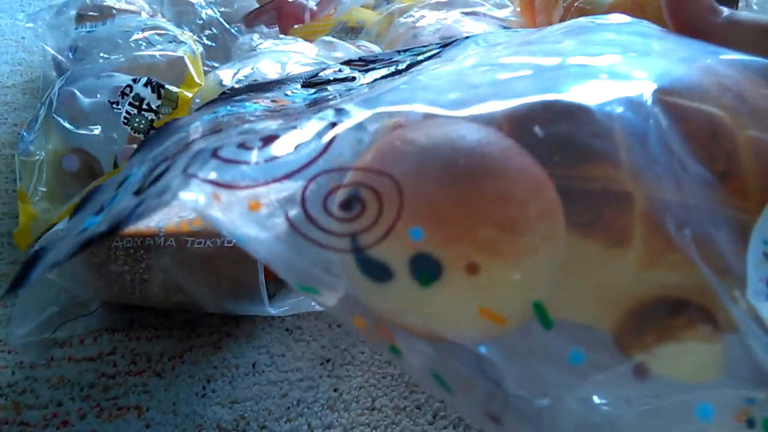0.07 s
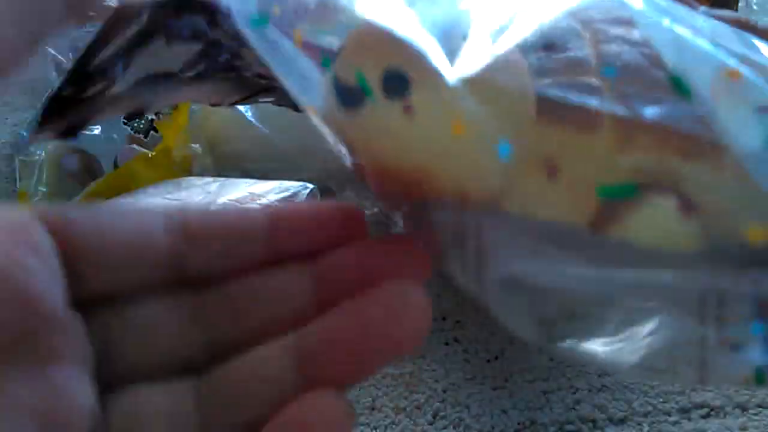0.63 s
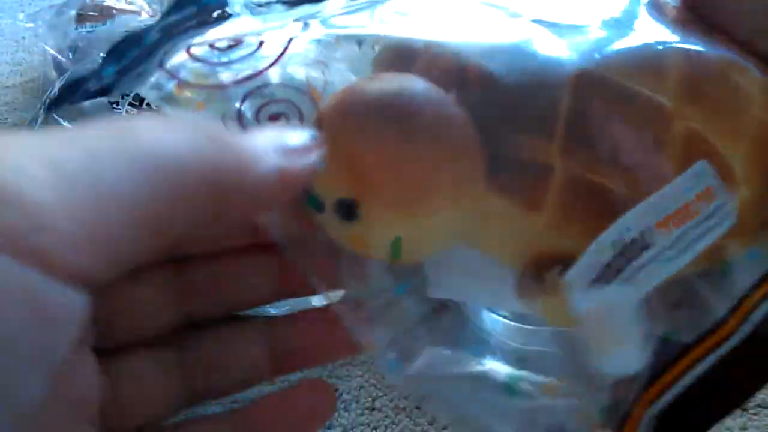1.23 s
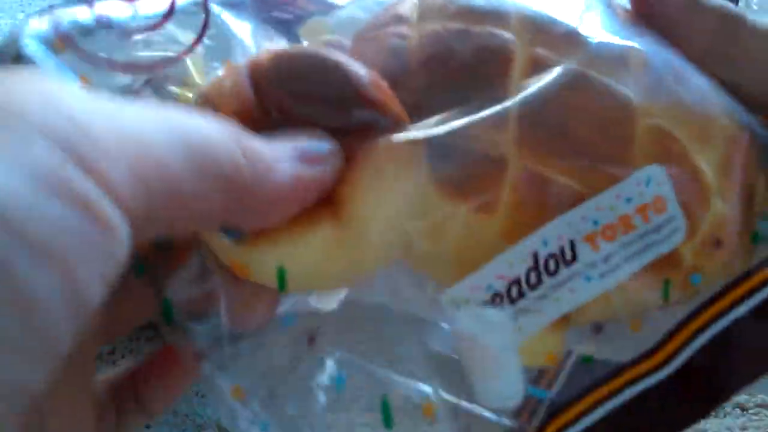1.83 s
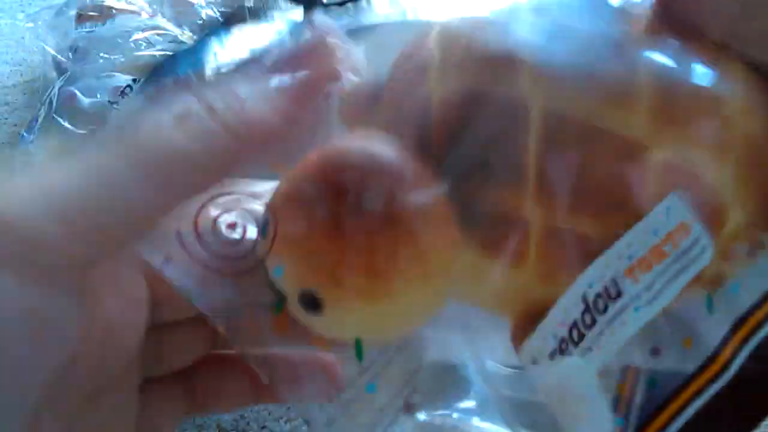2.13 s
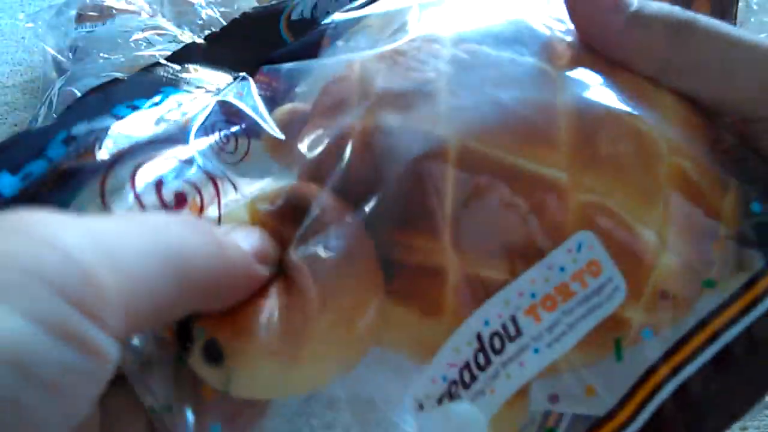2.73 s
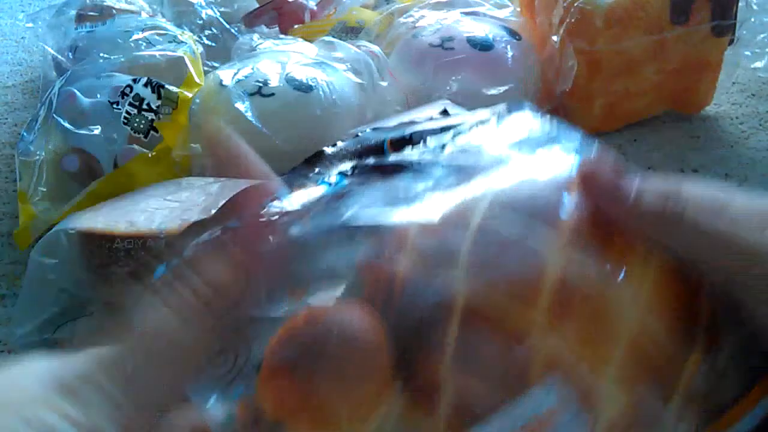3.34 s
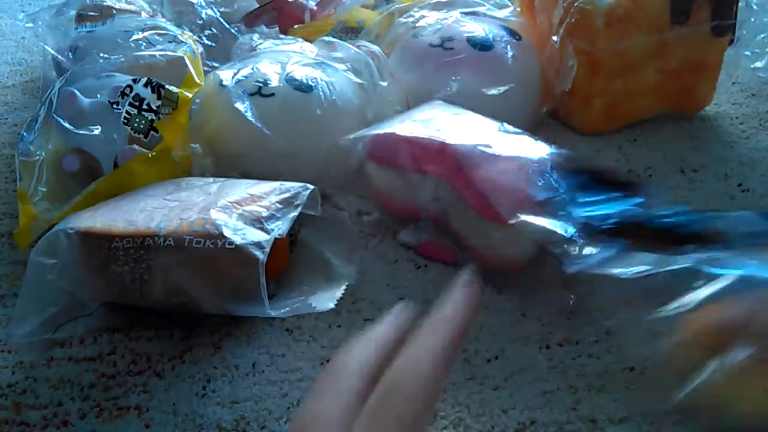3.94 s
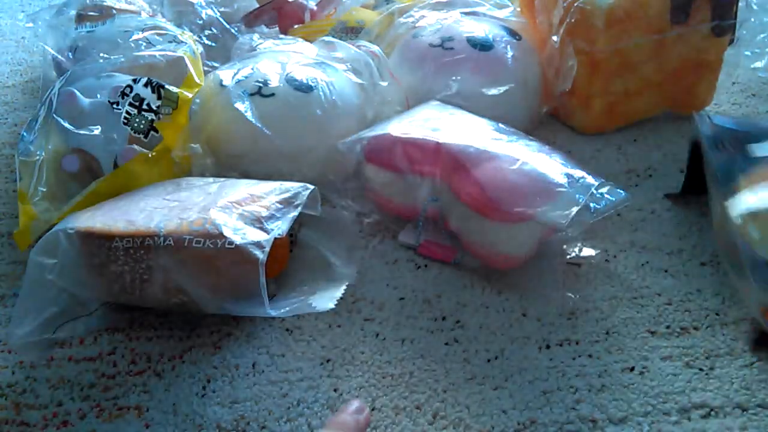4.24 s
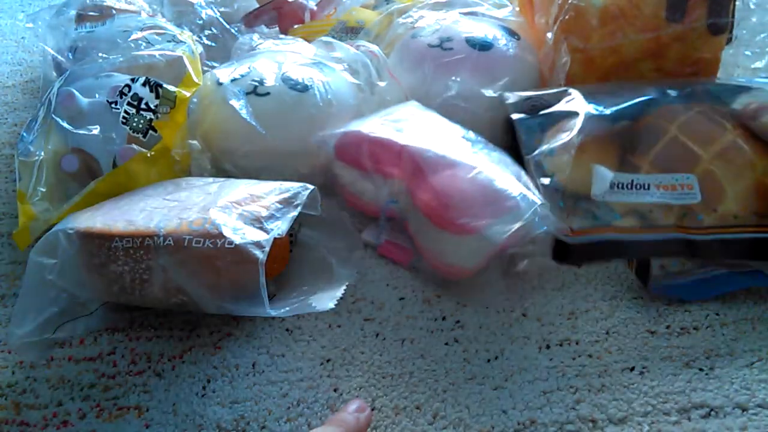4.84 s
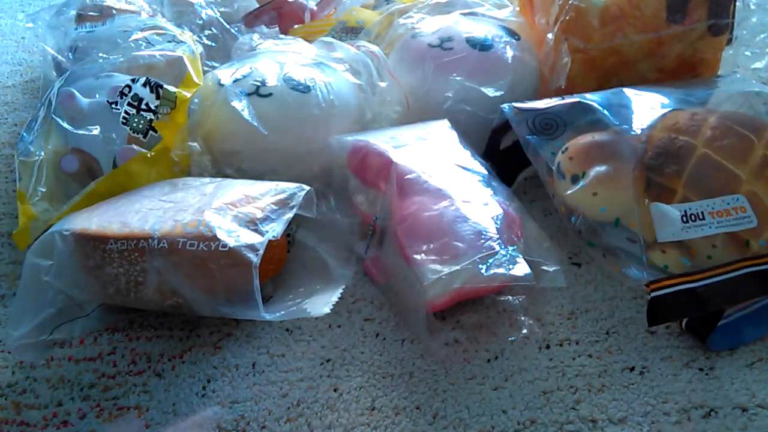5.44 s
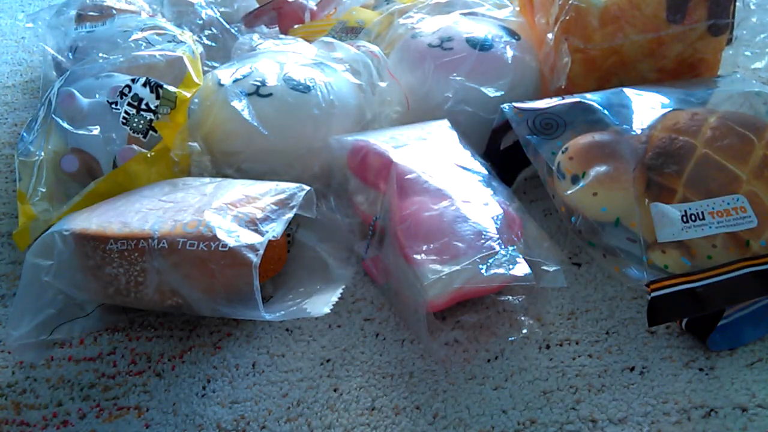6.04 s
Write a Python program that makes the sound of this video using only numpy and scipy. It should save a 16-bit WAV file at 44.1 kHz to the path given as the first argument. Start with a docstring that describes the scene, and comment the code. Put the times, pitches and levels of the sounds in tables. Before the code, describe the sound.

A stiff plastic bag crinkles and snaps close by as a foam toy inside is squeezed, then slides hissing across carpet.

```python
"""A dry, furnished room with a carpet; one small microphone close to a foam toy in a stiff plastic bag.
The bag is squeezed, then pushed aside along the carpet. Creases buckle in single sharp snaps over
a bed of tiny crinkles, the film hisses as it slides, and carpet fibres scrape under it.
Hands and toy rumble softly close by; behind them are the room's short tail and its low hum."""
import sys
import numpy as np
from scipy import signal
from scipy.fft import rfft, irfft, next_fast_len
from scipy.io import wavfile
from scipy.ndimage import map_coordinates

SR = 44100
rng = np.random.default_rng(int(sys.argv[2]) if len(sys.argv) > 2 else 0)


def transcribe(signal):
    """Save signal, clipped to [-1, 1], as a 16-bit WAV file at the path in sys.argv[1]."""
    frames = np.atleast_2d(signal).T
    limited = np.clip(frames, -1, 1)
    pcm = np.round(limited * 32767).astype(np.int16)
    wavfile.write(sys.argv[1], SR, pcm)


N = 268128

# Levels in the tables are relative; each layer's own gain is applied on top.
# creases buckling: start_s, level_db, brightness_db_per_octave, panel_pitch_hz, pop_db
CREASE_SNAPS = [(0.325, -18, 6.5, 7440, -6), (0.3826, -19.5, 4.5, 7650, 5), (0.494, -21, -6, 1550, 14),
                (0.653, -24.5, 6.5, 1500, 28), (0.676, -10.5, 4, 1310, 14), (0.899, -37, 13, 7500, 7),
                (0.9538, -23.5, 11, 4000, 3), (1.0256, -11.5, -6, 2500, 5), (1.0363, 15.5, 3.5, 1310, 6),
                (1.0854, 11, 0.5, 1400.0, 10), (1.1103, -3.5, 0.5, 1300.0, 15), (1.15, 14, 1.5, 1600.0, 6),
                (1.1798, 0, -2, 3120, 2.5), (1.276, -13, -7, 1500.0, 8.5), (1.2942, 10.5, 0.5, 6400, 8),
                (1.3085, -1.5, -1, 4400.0, 5), (1.3282, -6.5, -2.5, 1640, 15.5),
                (1.3768, -20, -2, 1450, 20), (1.4887, 1.5, 3, 5830, 10), (1.5094, -6.5, -2, 1700, 25),
                (1.5632, -21.5, -9, 1510, 8.5), (1.6273, -11, -1.5, 1480, 13.5), (1.6598, 4, 4, 1310, 14.5),
                (1.6656, -2, -3, 1500.0, 15), (1.6726, -10, 8, 1700.0, 23), (1.6853, 11, -3, 1500.0, 4),
                (1.6958, 9, 3, 1400.0, 13), (1.6999, 8.5, -3, 1450, 12.5), (1.7122, 12, 4, 1480, 17.5),
                (1.7602, -3.5, 3.5, 1690, 16.5), (1.7802, -3, -3.5, 2730, 9), (1.9914, 10, 2, 1860, 4),
                (1.9997, -21.5, -5.5, 1840, 22), (2.1022, -7.5, 1, 4730, 9),
                (2.1324, -17.5, 12.5, 6100, 12.5), (2.187, 8, 3, 1200.0, 13.5),
                (2.211, -3.5, -3, 5000.0, 24), (2.2179, 7.5, -1, 1630, 7), (2.2867, 12.5, 2.0, 1800, 14),
                (2.2945, 9.5, -1.5, 1600.0, 4), (2.3492, 8, -0.5, 1860, 11), (2.4509, -9.5, -4, 1800.0, 9),
                (2.484, -21, -4.5, 1400.0, 20), (2.5163, 0, -3, 2860, 11), (2.5313, 4.5, -1.5, 7360, 9.5),
                (2.5343, 6, 3.5, 1630, 12), (2.5802, -1.5, -2, 1970, 4), (2.6329, -5, -4, 2000.0, 5),
                (2.6365, 5.5, 0, 1250, 16.5), (2.6566, -1.5, 1, 1740, 15), (2.6858, 10.5, 3.5, 2500, 13.5),
                (2.739, 5.5, 2.5, 756, 10), (2.742, -5.5, -2.5, 3900.0, 15), (2.7638, -2, 3.5, 4970, 5),
                (2.7737, -10.5, -5.5, 1590, 9.5), (2.986, 6.5, 2.5, 1640, 13.5),
                (3.0993, -7, 6.5, 700.0, 25), (3.1116, -11.5, -5.5, 2330, 16), (3.1533, 8, 2, 7500.0, 3),
                (3.1585, 4.5, 5.5, 6300.0, 16.5), (3.1612, 17.5, 4, 1970, 10), (3.1721, 3.5, -5, 5000.0, 9),
                (3.19, -6, -2, 7500, 11), (3.2027, -2, -2, 1800, 2), (3.268, -1, -3.5, 940.0, 0),
                (3.386, -12.5, -7.5, 900, -8), (3.4765, -10.5, 6.5, 1300.0, 18),
                (3.498, 2.5, -2, 3900.0, 7), (3.504, 19, 2.5, 860, 4.5), (3.607, 7, -2.5, 3560, 5),
                (3.6517, 2.5, -2.5, 6800, 14), (3.6598, 6.5, -4.5, 2000.0, 7.5), (3.692, 7, -1, 7500.0, 8),
                (3.709, -6.5, 6, 940.0, 26), (3.7297, -4, 2, 3070, 19), (3.753, -1, -1.5, 2000.0, 4.5),
                (3.7893, -10, -5.5, 2600.0, 11), (3.823, 0, -3.5, 4720, 8), (3.848, -0.5, -3, 890.0, 11.5),
                (3.8899, 1.5, -2.5, 1800.0, 13), (3.9013, 8.5, 0.5, 2200.0, 4.5),
                (3.9542, -4.5, -1, 1600.0, 11), (3.968, 7.5, 1.5, 700.0, 3.5),
                (3.9727, -3.5, 3.5, 7500.0, 6), (4.0134, 1, 8.5, 710, 20), (4.0289, 7.5, 0, 730, 11),
                (4.06, 11, 1.5, 700.0, 3.5), (4.0835, -13, -9.5, 3700.0, 17.5),
                (4.0877, -9.5, -6.5, 7100.0, 20), (4.174, -5, -4.5, 8100, 23.5),
                (4.3061, 5.5, -2, 3150, 7.5), (4.3955, -1, -2.5, 3300.0, 12.5), (4.4298, -8, -2, 740.0, 13),
                (4.4633, -2.5, -4, 7600, 11), (4.5192, 10.5, -2.5, 695, -6),
                (4.6159, 11.5, 2.5, 3700.0, 5.5), (4.638, 5, -1.5, 6400, 14.5),
                (4.675, -4.5, 1.5, 1730, 13.5), (4.7182, -6.5, 11, 900, 42), (4.7314, -4.5, 8.5, 8100, 9.5),
                (4.7789, 3.5, -5, 7640, 11), (4.809, -7, 13.5, 700.0, 21), (4.814, 7, 0.5, 7550, 1),
                (4.9224, 1.5, 8, 3460, 0), (5.0058, -7, 9, 7600, 7.5), (5.0217, 9, 0.5, 865, 10),
                (5.0808, 4.5, 6.5, 700.0, 8), (5.1039, 2, 1, 4570, 4.5), (5.1923, -2.5, -4, 2900.0, -2),
                (5.201, -5, -0.5, 1300.0, 3.5), (5.2764, -18, 10, 950, 38), (5.5154, 1, 8.0, 2970, 8.5)]
# a snapping panel of film: frequency_hz, level_db
FILM_SPECTRUM = [(100, -19), (370, -6), (690, -2.5), (1010, -8), (1400, -3.5), (1750, -3.5), (2200, -5.5),
                 (2830, -8.5), (4800, -10), (8140, -12), (10500, -18), (16000, -34)]
# narrow rings the microphone adds to every snap: pitch_hz, width_hz, level_db
MIC_RINGS = [(460, 23, -33), (3940, 220, 9)]
# many small creases together: frequency_hz, level_db
CRUMPLE_SPECTRUM = [(100, -5.5), (300, -1), (470, 4.5), (600, -6), (790, 3.5), (1200, -1.5), (1750, -1),
                    (2800, -7.5), (4100, -5.5), (6000, -24.5), (9000, -29), (16000, -32)]
# film sliding on skin and carpet: frequency_hz, level_db
SLIDE_SPECTRUM = [(500, -15.5), (2000, -9.5), (4400, -7.5), (6400, 1), (7600, -1.5), (9200, -2),
                  (11500, -10), (15500, -22.5)]
# sliding film catching in fine ticks: frequency_hz, level_db
TICK_SPECTRUM = [(500, -25), (2000, -6), (4500, -5), (7000, 1.5), (9200, 4.5), (11500, -8.5), (15500, -10)]
# the finest hiss of a light touch: frequency_hz, level_db
WHISPER_SPECTRUM = [(5000, -25), (9000, 6), (12000, 3), (15500, 0)]
# fingers press or shift the bag: peak_s, crumpling_db, sliding_db, toy_bump_db, rise_s, fall_s
FINGER_GRIPS = [(.53, -62, -76, -57, 0.046, .2), (.67, -49.5, -50, -54, 0.057, 0.081),
                (1.1, -48.5, -53.5, -47, 0.18, 0.22), (1.31, -44, -54, -56, 0.091, 0.066),
                (1.49, -49, -62, -58, 0.11, .12), (1.69, -35, -66, -60, 0.04, 0.067),
                (1.781, -41.5, -41.5, -54, 0.19, 0.12), (2.184, -32, -35.5, -40.5, 0.06, 0.051),
                (2.3, -46.5, -47, -56, 0.054, 0.033), (2.55, -46, -51.5, -41, 0.043, 0.2),
                (2.646, -50, -72, -35.5, 0.073, 0.066), (2.73, -45.5, -48, -46, 0.15, 0.29),
                (3.169, -26, -29, -30.5, 0.052, 0.083), (3.52, -41.5, -40, -48, 0.057, 0.48),
                (3.655, -37.5, -46, -53, 0.11, .1), (3.9, -35.5, -34, -34.5, 0.21, 0.13),
                (4.01, -33.5, -30.5, -54, 0.088, 0.077), (4.1, -60, -66, -39, 0.058, .08),
                (4.44, -47, -40, -36, 0.13, 0.14), (4.64, -32.5, -36.5, -36.5, 0.12, 0.084),
                (4.789, -39, -34, -31, .12, 0.034), (5.02, -40, -39, -43.5, 0.35, .2),
                (5.198, -33, -60, -36, .05, 0.027)]
# film glides under a hand: start_s, length_s, level_db
HAND_GLIDES = [(0.224, 0.11, -63.5), (.32, .12, -59.5), (.48, .19, -65), (0.92, .08, -64),
               (3.257, 0.089, -52), (3.55, 1.59, -58.5), (5.25, 0.2, -59.5), (5.509, 0.026, -41.5),
               (5.612, 0.084, -47), (5.783, 0.13, -51), (6.053, .1, -43.5)]
# the bag merely held: time_s, firmness_db
HOLD_FIRMNESS = [(0, -88), (.45, -73), (.55, -68.5), (.85, -74), (1.15, -87), (1.95, -63), (2.6, -50),
                 (3, -68), (3.35, -55), (3.75, -45.5), (4.2, -48.5), (4.6, -46), (4.88, -51), (5.1, -59),
                 (5.4, -69), (6.08, -73)]
# the bag pushed along the carpet: time_s, level_db
DRAG_LEVEL = [(3.75, -90), (3.9, -56.5), (4.05, -40), (4.15, -53), (4.28, -47.5), (4.36, -46), (4.6, -47.5),
              (4.8, -59.5), (5.05, -74.5), (5.2, -90)]
# carpet fibres scraping under the bag: frequency_hz, level_db
SCRAPE_SPECTRUM = [(200, 8.5), (330, 3.5), (470, 7), (580, -1), (800, 11), (1080, -14), (1400, -3),
                   (3300, -6), (5400, -1.5), (7700, -5), (8900, 2), (10200, -4), (12000, -10), (16000, -14)]
# unrest of the hands: time_s, rumble_db
HAND_UNREST = [(0, -38.5), (.2, -52.5), (1.3, -50.5), (2.05, -46), (2.9, -52), (3.6, -49), (4.1, -51.5),
               (5.35, -49), (5.6, -38.5), (6.08, -51)]
# handling rumble: frequency_hz, level_db
RUMBLE_SPECTRUM = [(10, 15), (30, 8.5), (60, -22.5), (100, -6), (200, -60), (500, -54)]
# dull bumps of the foam toy: frequency_hz, level_db
BUMP_SPECTRUM = [(50, 0.5), (95, -3), (125, -11.5), (165, -4.5), (230, -9), (330, -15.5), (600, -73)]
# decay of the room's tail: frequency_hz, t60_s
ROOM_DECAY = [(200, 0.36), (1500, 0.45), (6000, 0.56), (15000, 1.2)]
# colour of the room's tail: frequency_hz, gain_db
ROOM_SPECTRUM = [(150, 1), (500, 7), (1000, -1.5), (1600, -4), (2600, -1.5), (4000, -2), (9000, -5.5),
                 (14000, -8.5)]
# the room's steady air: frequency_hz, level_db
AIR_SPECTRUM = [(30, 0), (120, -3), (160, 3), (220, -5), (330, -13), (600, -25), (740, -17), (920, -15),
                (1100, -27), (2500, -36), (9000, -40), (14000, -46)]

FACET_RANGE_HZ = (250, 16000)  # where the film's small facets ring


def snaps(flutter_t60_s, flutter_db, lag_s, knee_hz, level_db, size=2048):
    """Each crease flips with a click and a brief flutter; gives the close sound and the room's feed."""
    t, hz = np.arange(size) / SR, np.fft.rfftfreq(size, 1 / SR)
    rings = sum(amp(db) * resonance(hz, pitch, width) for pitch, width, db in MIC_RINGS)
    shared_response = (1 - rings) * bending_chirp(hz, lag_s, knee_hz)
    close, to_room = np.zeros((2, N + size))
    for start_s, db, brightness, pitch_hz, pop_db in CREASE_SNAPS:
        flip = rng.standard_normal(size) * amp(-60 * t / flutter_t60_s)
        flip *= amp(flutter_db) / np.linalg.norm(flip)
        flip[0] += rng.choice([-1, 1])  # the click, ahead of its flutter
        colour = minimum_phase(db + snap_colour(hz, brightness, pitch_hz, pop_db))
        click = colour * rfft(flip) * shared_response * facet_modes(hz, mode_db=3, width_hz=30)
        start = round(start_s * SR)
        close[start:][:size] += irfft(click) * np.linalg.norm(colour) / np.linalg.norm(click)
        # summed over all directions, the peaks and notches of the facets even out
        to_room[start:][:size] += irfft(colour)
    return amp(level_db) * close[:N], to_room[:N]


def snap_colour(hz, brightness, pitch_hz, pop_db, pivot_hz=3000, half_width_octaves=0.51):
    """The film's spectrum in dB, tilted by the crease's sharpness, with a pop at the panel's pitch."""
    floored_hz = np.maximum(hz, FACET_RANGE_HZ[0])
    tilt = brightness * np.log2(floored_hz / pivot_hz)
    pop = pop_db / (1 + abs(np.log2(floored_hz / pitch_hz) / half_width_octaves) ** 1.83)
    return along(FILM_SPECTRUM, hz) + tilt + pop


def bending_chirp(hz, lag_s, knee_hz):
    """Low bending waves cross the film more slowly, so each click chirps downward."""
    delay_s = lag_s / (1 + (hz / knee_hz) ** 2)
    return np.exp(-2j * np.pi * np.cumsum(delay_s) * hz[1])


def facet_modes(hz, mode_db, width_hz, count=5):
    """The facets around a crease add a few damped modes, new for every shape of the bag."""
    pitches = np.exp(rng.uniform(*np.log(FACET_RANGE_HZ), count))
    return 1 + amp(mode_db) * sum(resonance(hz, pitch, width_hz + pitch / 20) for pitch in pitches)


def bag_rustle(crumpling, sliding, crumple_db, rustle_db, tick_db, hiss_db):
    """Crumpling film gives crinkles and a soft rustle; sliding film gives hiss and fine ticks."""
    crumple = amp(crumple_db) * crinkles(CRUMPLE_SPECTRUM, per_s=340, spread_db=28, colour_db=11.5)
    rustle = amp(rustle_db) * noise(CRUMPLE_SPECTRUM)
    ticks = amp(tick_db) * crinkles(TICK_SPECTRUM, per_s=260, spread_db=28, colour_db=10)
    hiss = amp(hiss_db + 0.59 * wobble(24)) * noise(SLIDE_SPECTRUM)
    # the finest hiss grows half a dB per dB of sliding, from a light touch at -60 dB
    whisper = amp(-66.5) * (sliding / amp(-60)) ** 0.5 * noise(WHISPER_SPECTRUM)
    # film that only slides hisses smoothly; film that also bends catches and ticks
    catching = np.minimum(crumpling / sliding, 1)
    slide = amp(-5 * catching) * hiss + catching * ticks
    return crumpling * (crumple + rustle) + sliding * slide + whisper


def crinkles(spectrum, per_s, spread_db, colour_db, panels=20, knots=12, size=1024):
    """Tiny creases of random size let go at random on many panels, each with its own colour; rms 1."""
    hz = np.fft.rfftfreq(size, 1 / SR)
    knots_hz = np.geomspace(*FACET_RANGE_HZ, knots)
    out = np.zeros(N)
    for _ in range(panels):
        tint = np.c_[knots_hz, colour_db * rng.uniform(-1, 1, knots)]
        colour = minimum_phase(along(spectrum, hz) + along(tint, hz))
        modes = facet_modes(hz, mode_db=6, width_hz=45)
        chirp = bending_chirp(hz, lag_s=0.0014 * rng.random(), knee_hz=6000)
        slips = np.flatnonzero(rng.random(N) < per_s / panels / SR)
        draws = rng.uniform(-1, 1, N)[slips]
        impulses = np.zeros(N)
        impulses[slips] = np.sign(draws) * amp(-spread_db * abs(draws))
        out += signal.oaconvolve(impulses, irfft(colour * modes * chirp))[:N]
    return unit_rms(out)


def handling(creep_db, resting_bump_db):
    """Gains of crumpling, sliding and bumping: grips and glides add their power to the held bag's."""
    firmness_db = level_curve(HOLD_FIRMNESS)
    power = amp([firmness_db, firmness_db + creep_db, np.full(N, resting_bump_db)]) ** 2
    for peak_s, *levels_db, rise_s, fall_s in FINGER_GRIPS:
        power += np.outer(amp(levels_db), swell(peak_s, 0, rise_s, fall_s)) ** 2
    for start_s, length_s, db in HAND_GLIDES:
        power[1] += (amp(db) * swell(start_s, length_s, rise_s=0.076, fall_s=0.14)) ** 2
    return np.sqrt(power)


def carpet_drag(grain_db):
    """Carpet fibres flick under the moving bag: a dense, bright scrape."""
    return amp(level_curve(DRAG_LEVEL) + grain_db * wobble(70)) * noise(SCRAPE_SPECTRUM)


def hands_and_toy(bumping, rumble_db, bump_db):
    """Restless hands rumble near the microphone and the foam toy bumps dully."""
    rumble = amp(level_curve(HAND_UNREST) + rumble_db + 0.67 * wobble(14)) * noise(RUMBLE_SPECTRUM)
    return rumble + amp(bump_db) * bumping * noise(BUMP_SPECTRUM)


def room_tail(source, wet_db, gap_s, tails=4):
    """A short diffuse tail; the moving bag feeds a few different ones in turn, 50 ms each."""
    out = np.zeros(N)
    turn = np.arange(N) // (SR // 20) % tails
    for k in range(tails):
        hz, t, bands = signal.stft(rng.standard_normal(SR // 2), SR, nperseg=256)
        bands *= amp(-60 * t / along(ROOM_DECAY, hz)[:, None])  # each band dies at its own speed
        tail = signal.istft(bands, SR, nperseg=256)[1]
        tail = np.pad(tail / np.linalg.norm(tail), (round(gap_s * SR), 0))
        out += signal.oaconvolve(source * (turn == k), tail)[:N]
    return amp(wet_db) * filtered(out, lambda hz: amp(along(ROOM_SPECTRUM, hz)))


def room_tone(level_db):
    """The room's air: a steady low hum of noise behind everything."""
    return amp(level_db) * noise(AIR_SPECTRUM)


def amp(db):
    """Decibels to gain."""
    return 10 ** (np.asarray(db) / 20)


def unit_rms(x):
    """x scaled to rms 1."""
    return x / np.sqrt(np.mean(x ** 2) + 1e-20)


def along(points, hz):
    """Rows of frequency_hz, value read on a log frequency axis."""
    frequencies, values = np.transpose(points)
    return np.interp(np.log(hz + 1), np.log(frequencies + 1), values)


def level_curve(rows):
    """Rows of time_s, level_db joined into one level per sample."""
    return np.interp(np.arange(N) / SR, *np.transpose(rows))


def swell(start_s, length_s, rise_s, fall_s):
    """Gain that climbs 20 dB per rise_s, holds at 1 from start_s, then loses 20 dB per fall_s."""
    t = np.arange(N) / SR - start_s
    return amp(-20 * np.maximum(np.maximum(-t / rise_s, (t - length_s) / fall_s), 0))


def wobble(per_s):
    """A smooth random curve with per_s knots a second."""
    knots = rng.standard_normal(int(N * per_s / SR) + 4)
    return map_coordinates(knots, [np.arange(N) * per_s / SR])


def filtered(x, response):
    """x passed through a frequency response."""
    size = next_fast_len(N + SR // 2)
    return irfft(rfft(x, size) * response(np.fft.rfftfreq(size, 1 / SR)), size)[:N]


def noise(spectrum):
    """Coloured noise of rms 1."""
    return unit_rms(filtered(rng.standard_normal(N), lambda hz: amp(along(spectrum, hz))))


def minimum_phase(db):
    """The causal response with these gains: nothing sounds before the click."""
    cepstrum = irfft(np.log(amp(db)))
    half = len(cepstrum) // 2
    return np.exp(rfft(np.r_[cepstrum[0], 2 * cepstrum[1:half], np.zeros(half)]))


def resonance(hz, pitch_hz, width_hz):
    """One damped mode, of gain 1 at its pitch."""
    return 1j * hz * width_hz / (pitch_hz ** 2 - hz ** 2 + 1j * hz * width_hz)


def scene():
    """Bag and hands close to the microphone, the room behind; mono."""
    crumpling, sliding, bumping = handling(creep_db=-10, resting_bump_db=-61)
    crumpling *= amp(3 * wobble(35))  # the film catches and lets go unevenly
    close, to_room = snaps(flutter_t60_s=0.01, flutter_db=5, lag_s=0.000688, knee_hz=5270, level_db=0.5)
    rustling = bag_rustle(crumpling, sliding, crumple_db=-3.5, rustle_db=-8, tick_db=-2.5, hiss_db=-3)
    rustling += carpet_drag(grain_db=3.5)
    tail = room_tail(to_room + rustling, wet_db=-16, gap_s=0.007)
    air = room_tone(level_db=-54)
    hands = hands_and_toy(bumping, rumble_db=6, bump_db=-1)
    return (close + rustling + hands + tail + air)[None]


def record(dry):
    """The small microphone rounds off the tallest snaps and keeps nothing above its band limit."""
    ceiling, hardness, top_hz = 0.68, 6, 15900
    rounded = dry[0] / (1 + abs(dry[0] / ceiling) ** hardness) ** (1 / hardness)
    return filtered(rounded, lambda hz: hz < top_hz)[None]


dry = scene()
out = record(dry)
transcribe(out)
```